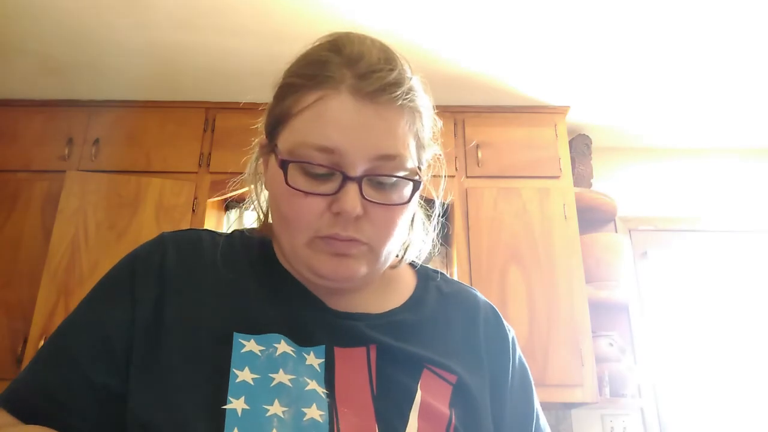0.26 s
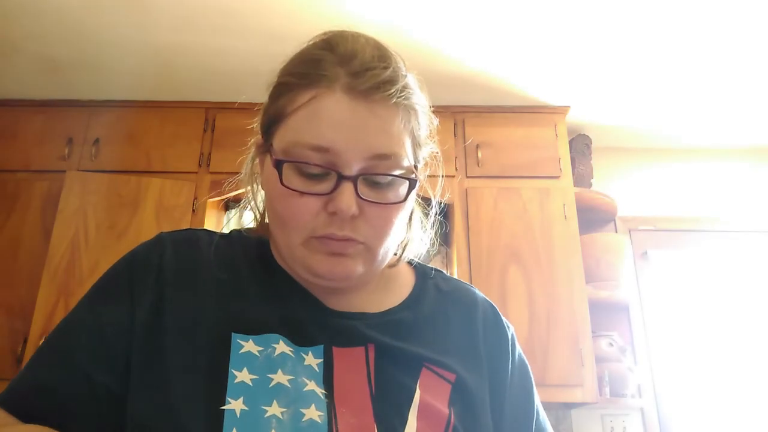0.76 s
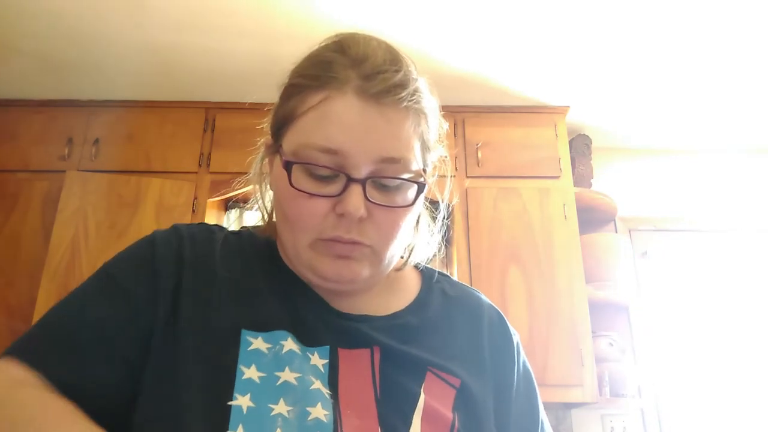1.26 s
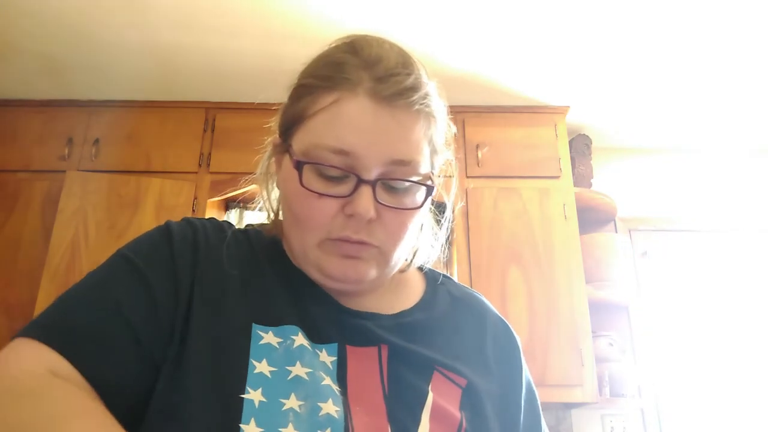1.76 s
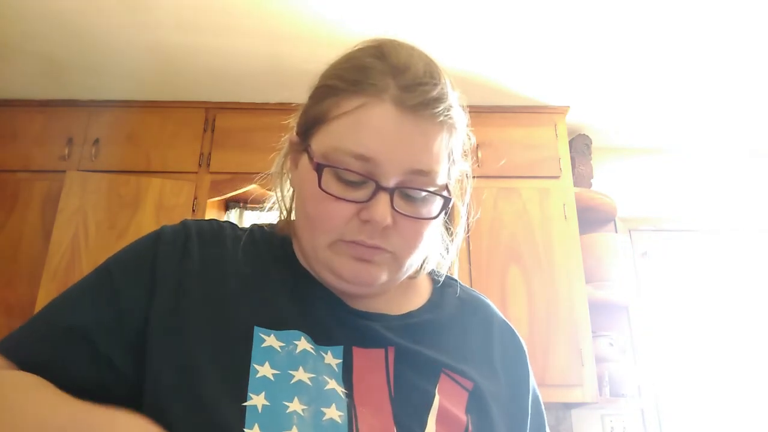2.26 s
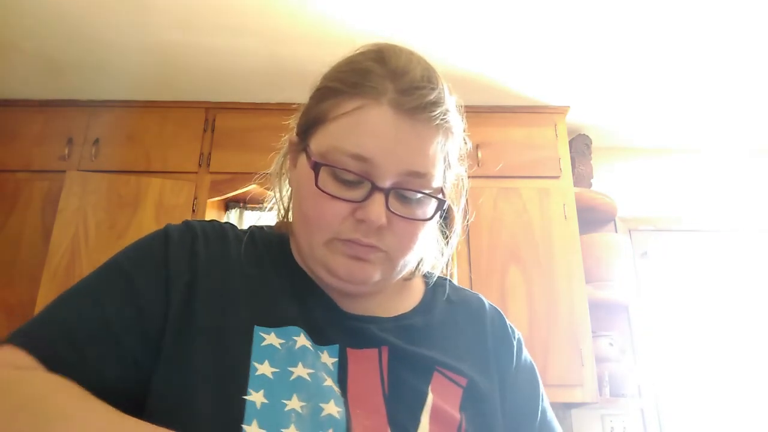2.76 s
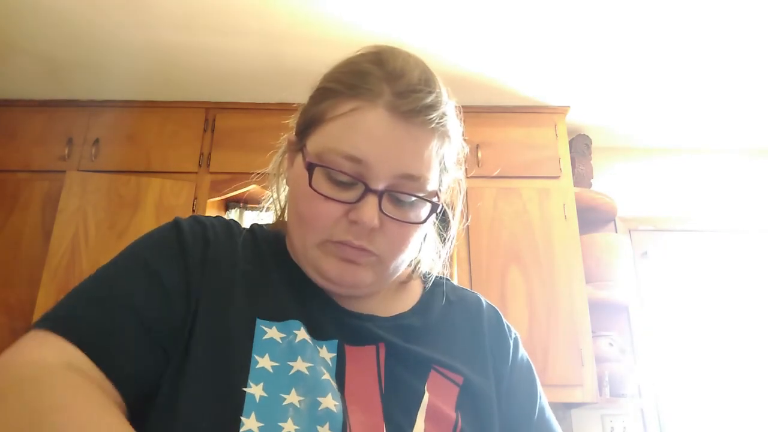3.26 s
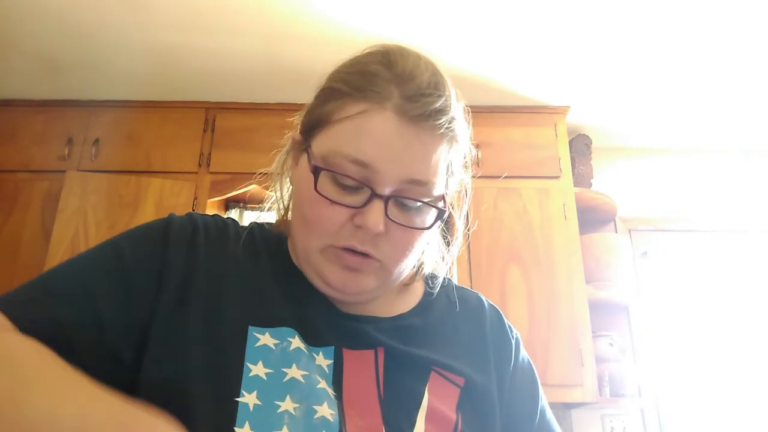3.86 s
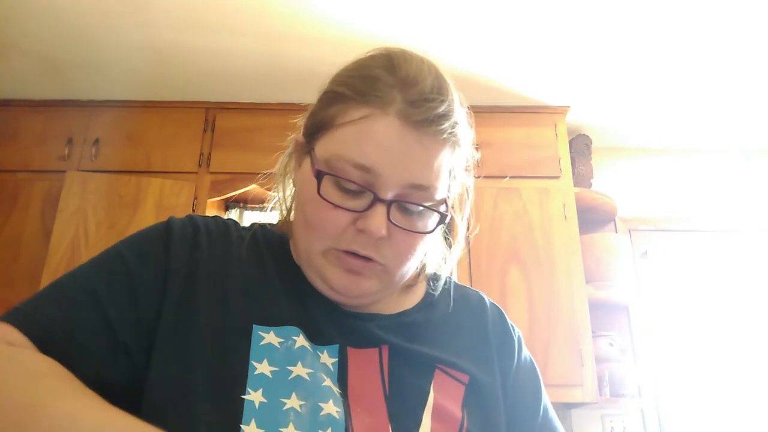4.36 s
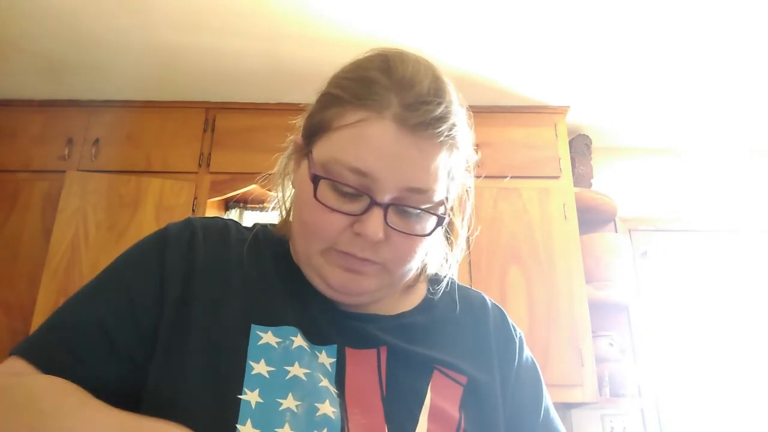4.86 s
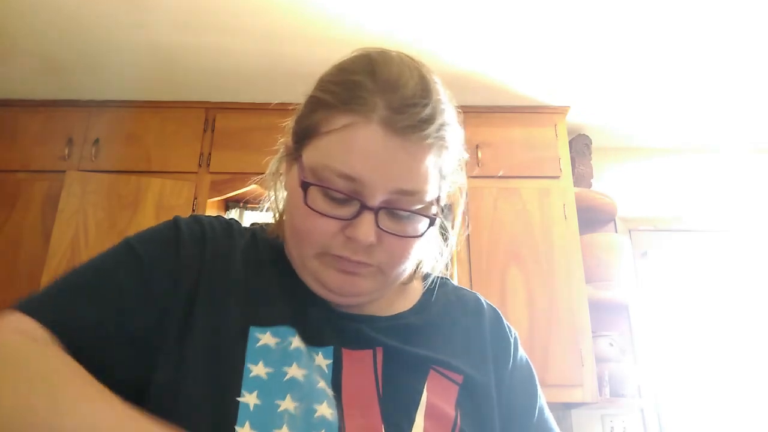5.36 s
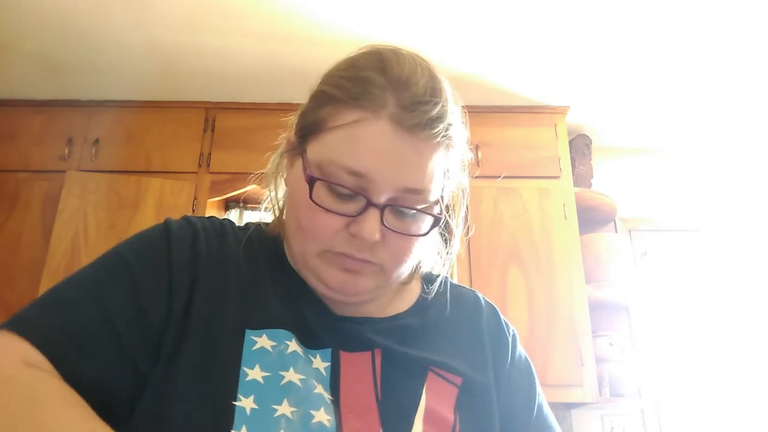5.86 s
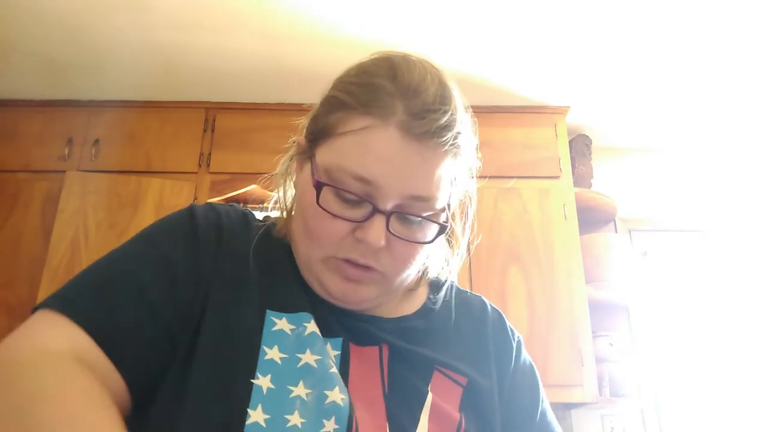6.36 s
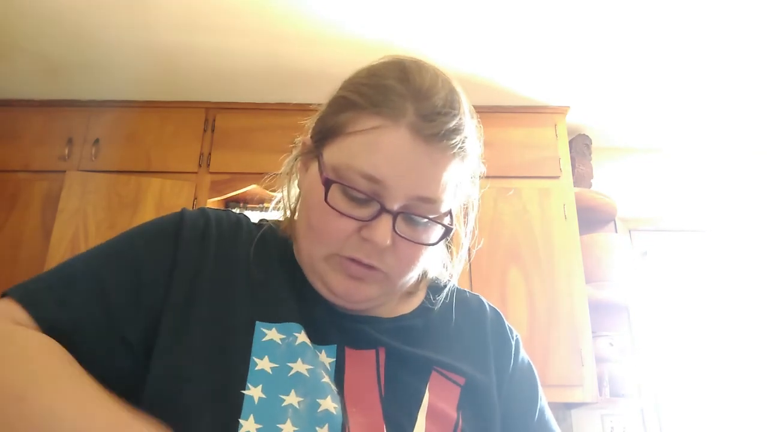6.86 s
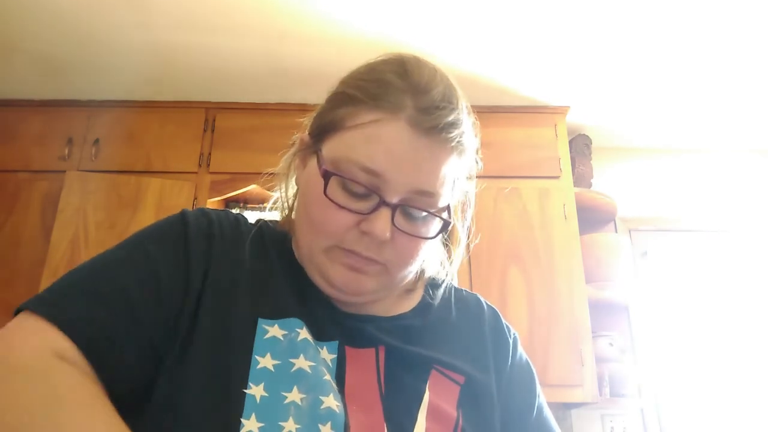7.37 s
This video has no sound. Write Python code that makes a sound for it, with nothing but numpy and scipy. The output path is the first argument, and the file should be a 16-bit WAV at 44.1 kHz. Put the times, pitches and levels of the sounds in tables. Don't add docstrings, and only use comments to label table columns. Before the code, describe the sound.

Close kitchen kneading: brief dry hisses of flour, a hard ringing bowl slam early on, later dull thuds through the counter, quiet fridge behind.

```python
import sys
import numpy as np
from scipy import signal
from scipy.fft import rfft, irfft, next_fast_len
from scipy.io import wavfile
from scipy.ndimage import uniform_filter1d, map_coordinates

SR = 44100
rng = np.random.default_rng(int(sys.argv[2]) if len(sys.argv) > 2 else 0)


def transcribe(u):
    v = np.clip(np.atleast_2d(u).T, -1, 1)
    q = np.round(v * 32767).astype(np.int16)
    wavfile.write(sys.argv[1], SR, q)


def volts(x):
    e = np.asarray(x, float) / 20
    return 10 ** e


N = 336247
STEP = 16
BOWL_PAN_DB = 4.5

# pitch in Hz, level in dB.
RIM_MODES = [(435, -1.5), (467, -18), (565, 8), (637, 7.5), (692, -1), (770, -38), (835, -19), (950, 4),
             (1040, 3), (1335, -9), (1590, -37), (1720, -13), (1950, -25.5), (2250, -31)]


def unit(x):
    return x / np.sqrt(np.mean(x ** 2) + 1e-20)


def along(points, hz):
    f, v = np.transpose(points)
    return np.interp(np.log(hz + 1), np.log(f + 1), v)


def wobble(rate):
    at = np.arange(0, N + STEP, STEP)
    knots = rng.standard_normal(int(N * rate / SR) + 4)
    return np.interp(np.arange(N), at, map_coordinates(knots, [at * rate / SR]))


def filtered(x, response):
    m = next_fast_len(N + 8192)
    return irfft(rfft(x, m) * response(np.fft.rfftfreq(m, 1 / SR)), m)[..., :N]


def rush(spectrum, grain_db):
    # pitch in Hz, likeness of left and right (1 is identical).
    likeness = [(60, 0.85), (180, 0.88), (550, 0.16), (1650, 0.028), (4970, -0.016), (15000, -0.041)]
    # pitch in Hz, left over right in dB.
    side_lean = [(60, 3.5), (180, 0), (550, 0.5), (1650, 0.5), (4970, 3.5), (15000, -13.5)]
    m = next_fast_len(N + 8192)
    hz = np.fft.rfftfreq(m, 1 / SR)
    turn = np.arccos(np.clip(along(likeness, hz), -1, 1)) / 2
    grains = rng.standard_normal((2, N)) * volts(grain_db * wobble(400))
    a, b = rfft(grains, m) * volts(along(spectrum, hz))
    mid = a * np.cos(turn)
    side = b * np.sin(turn)
    lean = volts(np.outer([.5, -.5], along(side_lean, hz)))
    return unit(irfft([mid + side, mid - side] * lean, m)[:, :N])


def add(track, s, sound, pan_db):
    track[:, round(s * SR):][:, :sound.shape[1]] += sound * volts([[pan_db / 2], [-pan_db / 2]])


def echoed(sound, wet_db):
    # pitch in Hz, time to fade by 60 dB in seconds.
    echo_times = [(100, 0.37), (500, 0.14), (1000, 0.25), (2000, 0.21), (5000, 0.027), (12000, 0.05)]
    hz, t, z = signal.stft(rng.standard_normal((2, SR // 4)), SR, nperseg=256)
    fading = z * volts(-60 * t / along(echo_times, hz)[:, None])
    tail = signal.istft(fading, SR, nperseg=256)[1]
    delayed = np.pad(sound.mean(0), (200, 0))[None]
    wet = signal.fftconvolve(delayed, tail / np.linalg.norm(tail[0]), axes=1)
    return volts(wet_db) * wet + np.pad(sound, ((0, 0), (0, wet.shape[1] - sound.shape[1])))


def ring(modes, t60, attack, spread, rough, size, thinning=0.44):
    t = np.arange(size) / SR
    hz, db = np.transpose(modes)[:, :, None]
    luck = rng.standard_normal((2, len(modes), 1))
    drift = rng.standard_normal((len(modes), size))
    cycle = int(2 * SR / hz.min())
    drift = uniform_filter1d(uniform_filter1d(drift, cycle), cycle)
    wander = rough * np.cumsum(drift, axis=1) * np.sqrt(hz / SR)
    fall_db = 60 * t / t60 * (hz / hz[0]) ** thinning
    shape = volts(db + 1.5 * luck[0] - fall_db) * (1 - np.exp(-t / attack)) ** 2
    phase = 2 * np.pi * hz * t + wander
    return np.array([(shape * np.sin(phase + way * spread * luck[1])).sum(0) for way in (1, -1)])


def gesture(s, db, hold, rise, sag, fall):
    since = np.arange(0, N, STEP) / SR - s
    rising_db = rise * np.minimum(since, 0)
    sagging_db = sag * np.clip(since, 0, hold)
    falling_db = fall * np.maximum(since - hold, 0)
    return volts(2 * (db + rising_db - sagging_db - falling_db))


def together(powers, weights_db):
    return np.interp(np.arange(N), np.arange(0, N, STEP), np.sqrt(volts(2 * weights_db) @ powers))


def kitchen():
    # pitch in Hz, level in dB per Hz.
    room_colour = [(18, -30), (38, -8.5), (52, -0.5), (70, -1), (130, -5), (172, -3), (221, -10), (348, -5),
                   (416, -11), (822, -11.5), (1050, -14.5), (1170, -23), (1670, -17), (2980, -32),
                   (4700, -22), (7990, -70), (12700, -46), (13200, -92.5), (22000, -120)]
    # time in seconds, load in dB.
    fridge_load = [(0.0, -23), (0.4, -0.5), (0.66, -4.5), (1.29, -1), (1.46, 6), (1.68, -5), (2.12, -1.5),
                   (2.42, -9), (2.67, -6), (3.0, -3.5), (3.9, -4), (4.3, 1), (4.5, -16.5), (4.99, 0.5),
                   (5.35, -13), (5.9, -0.5), (6.45, -2), (7.62, 0)]
    # pitch in Hz, level in dB.
    weak_hums = [(248, -77), (474, -83), (689, -82.5), (797, -83.5)]
    t = np.arange(N) / SR
    load_db = np.interp(t, *np.transpose(fridge_load))

    def line(hz):
        return volts(5 * wobble(11)) * np.sin(2 * np.pi * hz * t + 2.0 * wobble(13))

    hum = volts(-68 + 0.059 * load_db) * line(179)
    hum = hum + volts(-65.5 + load_db) * line(359)
    hum = hum + sum(volts(db + 2.5) * line(hz) for hz, db in weak_hums)
    room = volts(-61.5 + 0.58 * wobble(3.26)) * rush(room_colour, grain_db=1.2)
    return room + hum * volts([[1.2], [-1.2]])


def counter():
    # start in seconds, peak in dB, pitch in Hz, time to fade by 60 dB in seconds.
    sways = [(0.299, -28.5, 67.5, 0.11), (0.345, -26.5, 46.3, 0.074), (1.41, -50.5, 59.7, 0.15),
             (1.442, -54, 64, 0.14), (1.546, -42, 58.5, 0.16), (2.055, -48, 127, 0.14),
             (2.119, -44, 133.6, 0.33), (2.177, -40, 95, 0.12), (2.649, -19.5, 95.9, 0.099),
             (2.702, -30, 97.5, 0.14), (2.737, -23, 53.5, 0.12), (2.781, -39, 56.7, 0.13),
             (2.828, -46, 101.5, 0.086), (2.971, -37.5, 101.4, 0.086), (2.993, -35, 57.8, 0.076),
             (3.324, -46.5, 106.6, 0.13), (3.805, -38.5, 53, 0.12), (4.278, -46.5, 60, 0.088),
             (4.995, -24.5, 83.3, 0.036), (5.024, -34, 58, 0.077), (5.129, -45.5, 56.7, 0.12),
             (6.139, -35.5, 50.96, 0.091), (6.17, -39.5, 63, 0.11), (6.783, -10.5, 86, 0.041),
             (6.809, -21, 63, 0.048), (7.303, -35.5, 101.8, 0.19), (7.33, -42, 184, 0.15),
             (2.06, -40, 51.83, 0.4), (7.332, -22, 53.3, 0.054)]
    track = np.zeros((2, N + SR))
    for s, db, hz, t60 in sways:
        modes = [(hz, 0), (1.6 * hz, -7)]
        wobbles = ring(modes, np.clip(t60, .04, .6), attack=0.0072, spread=0.11, rough=0.49, size=11000)
        add(track, s, volts(db + 7.0) * wobbles, pan_db=5)
    return track[:, :N]


def creaking():
    # start in seconds, creak level in dB, hold in seconds.
    creeps = [
        (3.594, -73, 0.2),
        (3.919, -66.5, .14),
        (4.06, -62, 0.029),
        (5.072, -64, 0.0766),
        (6.109, -59, 0.21),
    ]
    # pitch in Hz, level in dB per Hz.
    creak_colour = [(380, -69), (450, 7.5), (520, 6.5), (620, 4), (780, -38), (900, -31.5)]
    powers = [gesture(s, db, hold, rise=600, sag=0, fall=151) for s, db, hold in creeps]
    level = together(powers, np.zeros(len(creeps)))
    return level * volts(2.7 * wobble(36)) * rush(creak_colour, grain_db=5.5)


def clatter():
    # start in seconds, peak in dB, time to fade by 60 dB in seconds, dulling in dB an octave.
    clatters = [
        (2.0496, -24, 0.025, -3.5),
        (2.0525, -40, 0.19, 8),
        (2.066, -37.5, .06, 2),
        (2.0758, -39.5, .06, 3),
        (2.115, -46, 0.13, 11),
        (0.312, -51, 0.074, -2),
    ]
    # pitch in Hz, level in dB.
    wall_modes = [(1227, -1), (1280, -3), (1430, -2.5), (1520, -2), (1588, 1), (1715, 2), (1830, -4),
                  (1916, -2.5), (2010, -3), (2110, -1.5), (2200, -3), (2270, 0), (2340, -3), (2600, -8.5)]
    track = np.zeros((2, N + SR))
    for s, db, t60, dull_db in clatters:
        modes = [(hz, level - dull_db * np.log2(hz / wall_modes[0][0])) for hz, level in wall_modes]
        sound = ring(modes, t60, attack=0.00035, spread=1.0, rough=.12, size=5000)
        add(track, s, volts(db) * echoed(sound, wet_db=-10.5), pan_db=2.5)
    return track[:, :N]


def raps():
    # start in seconds, peak in dB, pitch in Hz, time to fade by 60 dB in seconds.
    rim_raps = [(0.3045, -14, 502, 0.044), (0.305, -30, 906, 0.1), (0.311, -17.5, 558, 0.06),
                (2.037, -37, 600, 0.093), (2.652, -34.5, 655, 0.091), (2.645, -48, 467, 0.03),
                (2.638, -48, 498, 0.043), (2.72, -49.5, 1010, 0.062), (4.268, -40, 630, 0.074),
                (6.11, -50, 521.6, 0.053), (6.238, -49, 605, 0.052), (6.29, -55, 560, 0.036),
                (6.318, -50, 650, 0.069), (6.438, -43.5, 604, 0.053), (6.7824, -33, 510, 0.045),
                (7.311, -45, 597, .05), (6.356, -50, 526, 0.051)]
    track = np.zeros((2, N + SR))
    for s, db, hz, t60 in rim_raps:
        near = [(mode, -45 * abs(np.log2(mode / hz))) for mode, level in RIM_MODES[:9]]
        sound = ring(near, t60, attack=0.0014, spread=0.495, rough=0.21, size=5000)
        add(track, s, volts(db) * echoed(sound, wet_db=-12.5), BOWL_PAN_DB)
    return track[:, :N]


def bowl():
    # start in seconds, body peak in dB, body pitch in Hz, rim level in dB,
    # time to fade by 60 dB in seconds.
    knocks = [(0.3041, -24, 376, -18, 0.1), (1.731, -40.5, 189, -27, 0.04),
              (2.6462, -15.5, 215, -31, 0.071), (2.728, -37.5, 180, -16.5, 0.062),
              (2.969, -40, 132, -15, 0.07), (3.33, -46.5, 174, -5, 0.044), (3.804, -53.5, 182, -25, 0.13),
              (4.268, -48, 222, -5.5, 0.092), (4.289, -56, 377, -26, 0.54), (4.996, -43, 132, -18.5, 0.081),
              (5.14, -52, 366, -12.5, 0.07), (6.111, -41.5, 290, -15.5, 0.045),
              (6.357, -45.5, 263, 1.5, 0.064), (6.732, -41.5, 191, 0.5, 0.025),
              (6.7821, -21.5, 270, -19, 0.053), (6.779, -34, 250, -21, 0.051),
              (7.3073, -25, 246, -27.5, 0.058), (7.325, -52.5, 372, -30, 0.22)]
    # pitch in Hz, level in dB.
    body_modes = [(150, -3.5), (185, -4), (215, 8), (260, 8), (310, -8.5), (372, 7.5)]
    track = np.zeros((2, N + SR))
    for s, db, hz, rim_db, t60 in knocks:
        t60 = np.clip(t60, .03, .6)
        struck = [(mode, level - 11 * abs(np.log2(mode / hz))) for mode, level in body_modes]
        weak = min(-db / 30, 1)
        reached = [(mode, level - 20 * weak * max(np.log2(mode / 640), 0)) for mode, level in RIM_MODES]
        body = volts(-0.5) * ring(struck, 0.67 * t60, attack=0.0023, spread=0.33, rough=0.5, size=8000)
        rim = ring(reached, t60, attack=0.0022 + 0.0033 * weak, spread=0.71, rough=0.075, size=8000)
        both = body + volts(rim_db + 3.2) * rim
        add(track, s, volts(db) * echoed(both, wet_db=-11.5), BOWL_PAN_DB)
    return track[:, :N]


def slam():
    # start in seconds, level in dB, share of the full ringing time, attack in seconds,
    # dulling in dB an octave.
    slams = [
        (2.0498, -7.5, 0.58, 0.00069, 3.5),
        (2.1136, -13.5, 0.29, 0.00089, 10),
        (2.138, -25.5, 0.3, 0.002, 4),
    ]
    # pitch in Hz, level in dB, time to fade by 60 dB in seconds.
    slam_modes = [(218.6, -5.5, .25), (281, -4, 0.16), (312.4, -0.5, 0.15), (375, 0, 0.23),
                  (428.3, -1, 0.13), (467, 2, 0.11), (575, 0, 0.13), (627.3, 3, 0.13), (762, -7, .15),
                  (826, -2, 0.14), (933, -3.5, 0.14), (1014, -7, 0.111), (1355, -6.5, .13),
                  (1587, -15.5, 0.14)]
    track = np.zeros((2, N + SR))
    late = round(.00025 * SR)
    for s, db, share, attack, dull_db in slams:
        modes = [(hz, level - dull_db * max(np.log2(hz / 1000), 0)) for hz, level, t60 in slam_modes]
        t60 = share * np.array(slam_modes)[:, 2:]
        left, right = ring(modes, t60, attack, spread=.3, rough=.15, size=11000, thinning=0)
        right = np.pad(right, (late, 0))[:len(left)]
        add(track, s, volts(db) * echoed(np.array([left, right]), wet_db=-10.0), pan_db=1.5)
    return track[:, :N]


def pops():
    # start in seconds, peak in dB, pitch in Hz, time to fade by 60 dB in seconds,
    # left over right in dB.
    air_pops = [(4.2371, -31, 2700, 0.014, 3), (6.6585, -40.5, 3370, 0.022, 7), (6.666, -62, 3800, .16, 5),
                (6.668, -63.5, 4200, 0.175, 6), (6.664, -67, 4900, 0.13, 4.5),
                (6.6595, -41, 4100, 0.013, 8), (6.661, -50, 4500, 0.012, 6),
                (0.3045, -28.5, 2800, 0.0099, 11), (0.3045, -31, 3300, 0.0086, 16),
                (0.3045, -29, 4100, .008, 10), (0.3115, -26, 3400, 0.012, 6),
                (0.4132, -37, 5300, 0.012, -4), (0.3205, -47, 2300, 0.014, 4),
                (3.9228, -48.5, 5300, .01, -1), (4.6916, -44.5, 3900, .01, -1.5)]
    # multiple of the pop's pitch, level in dB.
    pocket = [(.93, -5.5), (0.999, 3.5), (1.09, -3.5)]
    track = np.zeros((2, N + SR))
    for s, db, hz, t60, pan_db in air_pops:
        bundle = [(hz * multiple, level) for multiple, level in pocket]
        tone = ring(bundle, t60, attack=0.0012, spread=0.5, rough=.25 + 5 * t60, size=4000)
        add(track, s, volts(db + 2.5) * echoed(tone, wet_db=-19), pan_db)
    return track[:, :N]


def ticks():
    # start in seconds, peak in dB, pitch in Hz, crack level in dB, left over right in dB. The rows
    # near 2.05 s are the slam's click.
    sharp_ticks = [(0.314, -30.5, 1670, -41, -4), (0.4438, -41, 4870, -30, 0.5),
                   (1.133, -56, 3680, 0.5, 9), (1.146, -61, 4000, -1, 4), (1.269, -56, 2760, -21, -8),
                   (2.0499, -22, 1240, -30, -1), (2.0487, -26.5, 2150, -28, 12),
                   (2.05, -21.5, 2940, -28, 4), (2.106, -41, 5070, -5, -14), (2.0496, -30, 3503, -12.5, 4),
                   (4.2376, -37.5, 3280, -5.5, -1), (4.2395, -40.5, 1900, -26.5, 7.5),
                   (4.4011, -60.5, 2765, -13.5, 11), (4.4558, -45, 4840, -14, 5),
                   (5.5299, -43, 1827, -26.5, 11.5), (6.503, -58, 3300, -31.5, 16)]
    # start in seconds, peak in dB, pitch in Hz, crack level in dB,
    # left over right in dB.
    squeaks = [
        (1.338, -57.5, 1767, -33, 4.7),
        (6.321, -60, 2005, -35.5, 3),
    ]
    # multiple of the tick's pitch, level in dB.
    snap = [(.88, -3), (0.959, 5), (1.03, 6), (1.122, 1.5), (1.23, 2), (1.36, -10)]
    # pitch in Hz, level in dB.
    crack_modes = [(4300, 6.5), (5200, 9.5), (6200, -0.5), (7300, 7), (8800, 0), (10800, -7)]
    track = np.zeros((2, N + SR))
    events = [(row, 0.011) for row in sharp_ticks] + [(row, 0.09) for row in squeaks]
    for (s, db, hz, crack_db, pan_db), t60 in events:
        crack = ring(crack_modes, 0.0026, attack=.0001, spread=0.9, rough=1.0, size=3000)
        cluster = [(hz * multiple, level - 1.5) for multiple, level in snap]
        attack = max(.0001 - .000025 * crack_db, 1e-4)
        blip = ring(cluster, t60, attack, spread=0.81, rough=0.31, size=3000)
        both = volts(crack_db + 12.5) * crack + blip
        add(track, s, volts(db) * echoed(both, wet_db=-14), pan_db)
    return track[:, :N]


def rubbing():
    # peak in seconds, hiss in dB, hold in seconds,
    # depth of the low scrape in dB, sharpness of the top in dB.
    strokes = [(0.0, -66.5, 0.019, -13, -6), (0.417, -45.5, 0.031, -8.5, -12.5),
               (0.822, -50.5, 0, -21, -7.5), (0.872, -58, 0.047, -17, -9), (0.49, -55.5, 0.026, -7, -13),
               (0.593, -57, 0.054, -11.5, -11), (1.15, -64.5, 0, -4.5, -6.5),
               (2.131, -48, 0.0048, -20, -13.5), (2.677, -49.5, 0.049, -11, -12),
               (3.016, -71, 0.075, 2, -6), (3.09, -60.5, 0.011, -3, -16), (3.258, -51, 0.07, -7.5, -16),
               (3.835, -59.5, 0.1, -14.5, -7), (4.196, -59.5, 0.033, -11, -15.5),
               (3.933, -48, 0.041, -8, -11), (4.007, -53.5, 0.077, -11.5, -12),
               (4.248, -56, 0.056, -9.5, -10.5), (4.568, -59.5, 0.17, -7.5, -9),
               (5.066, -59.5, 0.064, -6, -17.5), (5.282, -54.5, 0.023, -6.5, -28),
               (5.658, -79, 0.068, 2, -2), (5.794, -47, 0.034, -12, -11.5), (6.072, -68, 0.12, -7, -11.5),
               (6.191, -56, 0.15, -3.5, -9.5), (7.264, -56.5, 0, -9, -11)]
    # start in seconds, hiss in dB, hold in seconds,
    # depth in dB, sharpness in dB.
    pats = [(0.305, -47.5, 0.035, 1.5, -19.5), (0.795, -52.5, 0.01, -21, -3.5),
            (1.0313, -54, 0.033, -20, -9.5), (1.455, -60, 0.067, -17, -8.5), (1.87, -59.5, 0.024, -17, -10),
            (2.048, -43.5, 0.0075, -4, -16.5), (2.095, -46.5, .012, -5, -9.5),
            (2.287, -59.5, 0.04, -20, -6.5), (2.513, -60, 0.07, -14, -7.5),
            (3.073, -55.5, 0.089, -8.5, -11), (3.321, -53, 0.025, -17.5, -7.5),
            (3.79, -66, 0.047, -10.5, -6), (4.174, -52, 0.011, -17, -10), (4.447, -58, 0.084, -15, -9.5),
            (4.681, -44, 0.043, -12.5, -12.5), (5, -64, 0.061, -15.5, -11.5),
            (5.53, -67.5, 0.0035, 14.5, -24), (6.658, -71, 0.032, -10, -16.5),
            (7.4047, -57.5, 0.042, -15.5, -9.5), (7.611, -60, 0.016, -15.5, -6.5)]
    # hiss in dB, depth in dB, sharpness in dB.
    rest = (-84, -1.1, -9.5)
    # pitch in Hz, level in dB per Hz.
    hiss_colour = [(2500, -46.5), (3300, -17.5), (4200, -6), (5200, 0), (6100, -3), (6800, -10),
                   (7600, -49)]
    scrape_colour = [(1000, -28.5), (1600, -2), (2300, 0.5), (3500, 2), (4500, -14), (6000, -52)]
    top_colour = [(5700, -46.5), (6600, 4), (8000, -2.5), (9600, -10), (10400, -40.5)]
    fine_colour = [(8300, -30.5), (9400, -2), (11000, -2), (12300, -5.5), (12900, -45)]
    air_colour = [(11500, -44.5), (12200, -5), (13500, -7), (14500, -1), (15700, -12.5), (15900, -59.5)]
    grit_colour = [(2700, -41), (3200, -2.5), (3800, 0), (4500, -1), (5000, -30)]

    land_s = .003
    moves = [(row, 270, -60) for row in strokes]  # row, rise in dB a second, slap in dB
    moves += [((row[0] + land_s, *row[1:]), 3800, -3) for row in pats]
    powers = [np.full(len(range(0, N, STEP)), volts(2 * rest[0]))]
    for (s, db, hold, *colour), rise, slap_db in moves:
        slide = gesture(s, db, hold, rise, sag=50.5, fall=230.5)
        linger = gesture(s, db - 28.5, hold, rise, sag=0, fall=119)
        slap = gesture(s, db + slap_db, 0, rise, sag=0, fall=600)
        powers.append(slide + linger + slap)
    depth_db, sharp_db = np.transpose([rest[1:]] + [row[3:] for row in strokes + pats])

    def drift():
        return volts(1.5 * wobble(14))

    stroke = together(powers, 0 * depth_db)
    hiss = stroke * drift() * rush(hiss_colour, grain_db=1.5)
    scrape = together(powers, depth_db + 2.0) * drift() * rush(scrape_colour, grain_db=1.8)
    top = together(powers, sharp_db + 4.5) * drift() * rush(top_colour, grain_db=1.0)
    fine = together(powers, 1.51 * sharp_db + 1.0) * rush(fine_colour, grain_db=2.0)
    dryness = together(powers, 2.63 * sharp_db + 3.5) * (stroke * volts(63.0)) ** 0.23
    air = dryness * volts(1.2 * wobble(8)) * rush(air_colour, grain_db=2.0)
    grit = together(powers, sharp_db - 5.0) * drift() * rush(grit_colour, grain_db=3.0)
    return volts(1.3 * wobble(46)) * (hiss + scrape + top + fine + air + grit)


def scene():
    background = kitchen() + counter() + creaking()
    bowl_sounds = clatter() + raps() + bowl() + slam()
    dough = pops() + ticks() + rubbing()
    return background + bowl_sounds + dough


def top_cut(x):
    return signal.sosfilt(signal.butter(12, 16460, fs=SR, output="sos"), x)


def record(dry):
    def microphone(hz):
        port = 1 + 0.4 * 1j * hz * 500 / (5300 ** 2 - hz ** 2 + 1j * hz * 500)
        bass_loss = (1j * hz / (1j * hz + 28)) ** 3
        return port * bass_loss * (hz < 15720)

    heard = filtered(dry, microphone)
    heard = heard / (1 + np.abs(heard / 1.05) ** 4) ** (1 / 4)
    return top_cut(heard)


dry = scene()
out = record(dry)
transcribe(out)
```